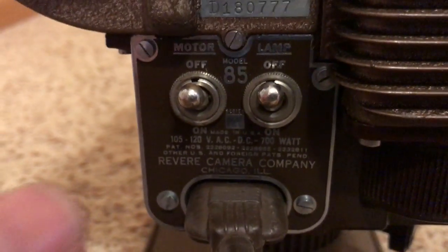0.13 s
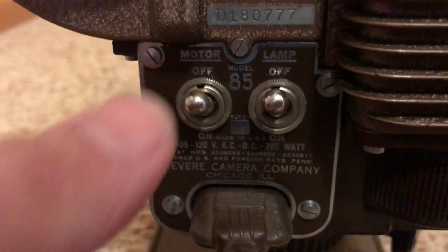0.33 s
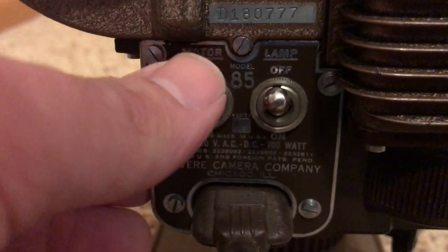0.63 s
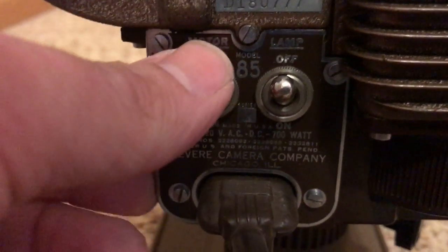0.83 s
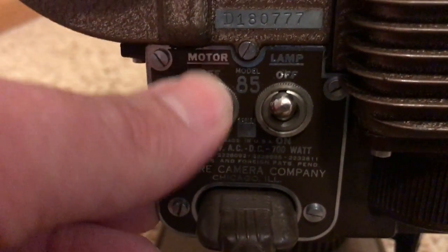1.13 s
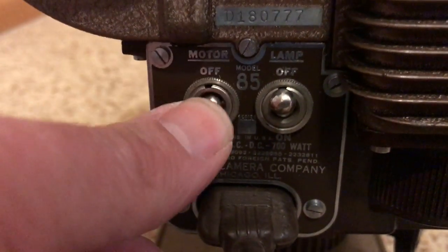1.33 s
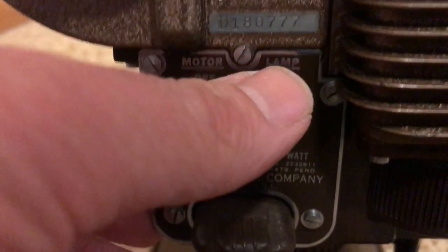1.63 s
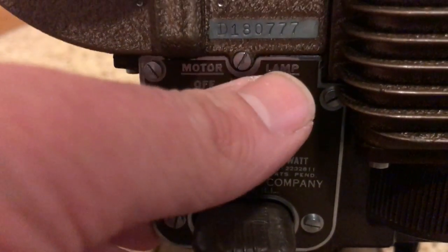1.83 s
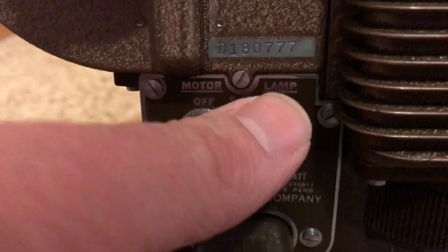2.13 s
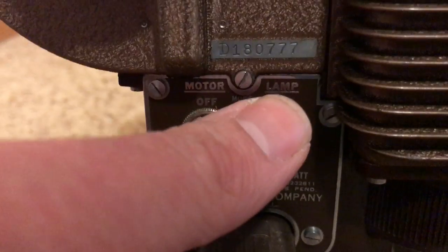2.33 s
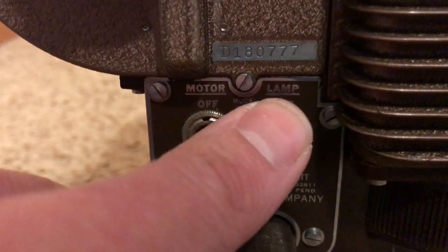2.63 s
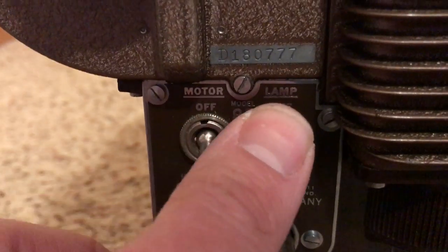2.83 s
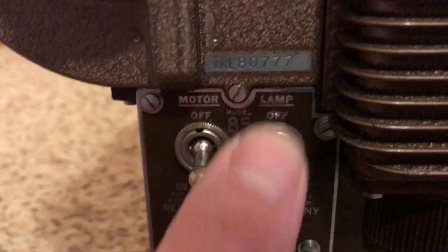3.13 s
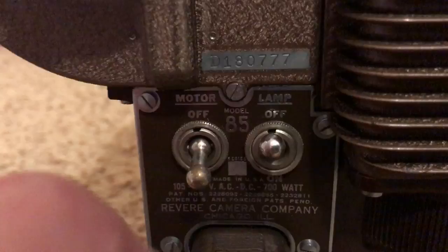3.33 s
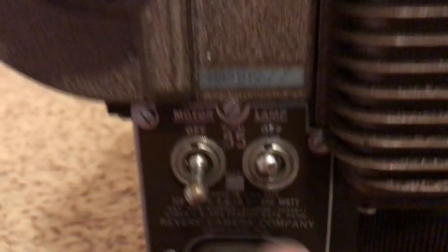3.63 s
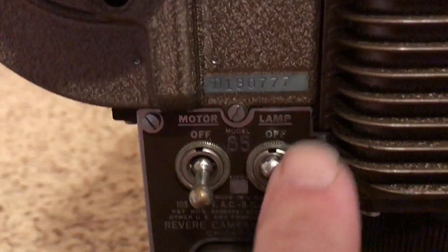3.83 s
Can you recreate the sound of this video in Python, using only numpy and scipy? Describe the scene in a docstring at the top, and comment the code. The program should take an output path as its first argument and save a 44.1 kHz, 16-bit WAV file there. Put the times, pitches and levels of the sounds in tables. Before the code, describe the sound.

An old film projector starts with one sharp toggle switch click, then its motor whines up into a steady whir of rushing fan and chattering gears, with a few light clacks. Close microphone in a quiet room.

```python
"""A faint rustle, a sharp click, then an old film projector whirs up to speed, close by in a quiet room.
The click is a thumb flipping a toggle switch, whose contacts bounce and ring a small plate.
As the motor spins up, the fan rushes and the gears whine, growl and chatter in the metal housing.
A dry bearing chirps, the belt slips twice, and now and then the running mechanism clacks."""
import sys
import numpy as np
from scipy import signal
from scipy.fft import rfft, irfft
from scipy.io import wavfile

SR = 44100
rng = np.random.default_rng(int(sys.argv[2]) if len(sys.argv) > 2 else 0)


def bounce(signal):
    """Save signal as a 16-bit WAV file at the path given by the first command-line argument."""
    frames = np.transpose(np.atleast_2d(signal))
    limited = np.clip(frames, -1, 1)
    pcm = np.round(limited * 32767).astype(np.int16)
    wavfile.write(sys.argv[1], SR, pcm)


N = 176400
T = np.arange(N) / SR
HZ = np.maximum(np.fft.rfftfreq(N, 1 / SR), 1)   # the frequency of each point in a spectrum

POWER_ON_S, FIRST_TICK_S = 1.273, 1.331
TOP_SPEED_HZ, TURNS_PER_FRAME = 101.55, 3   # shaft turns per second; turns per picture on the film

# tone colour of a sharp crack: f/Hz, level/dB
CRACK_SPECTRUM = [(300, -45), (1000, -2), (3000, -7), (6000, 2.5), (11000, 0.5), (16000, -12)]
# tone colour of rushing air: f/Hz, level/dB
AIR_SPECTRUM = [(27, -28), (48, -9.5), (160, -1.5), (280, -3.5), (550, 3), (1000, 3), (2000, -1.5),
                (2900, -5.5), (5500, -5.5), (8500, -7.5), (16000, -17.5)]
# tone colour of rattling machine parts: f/Hz, level/dB
CHATTER_SPECTRUM = [(100, -27), (330, -12), (680, -7.5), (900, -2.5), (1100, -1.5), (1350, -2), (2000, -13),
                    (4000, -19.5), (14000, -27)]


def from_db(db):
    """Turn decibels into a factor to multiply by."""
    return 10 ** (np.asarray(db) / 20)


def unit_power(x):
    """Scale a signal so that its average power is 1."""
    return x / np.sqrt(np.mean(x ** 2) + 1e-20)


def bell(hz, centre_hz, width_hz):
    """The hill-shaped curve of a resonance, 1 at its centre."""
    return 1 / (1 + (2 * (hz - centre_hz) / width_hz) ** 2)


def filtered(x, gain):
    """Multiply each frequency in x by its own gain."""
    return irfft(rfft(x) * gain, N)


def colour(x, spectrum, extra_db=0):
    """Give x the tone colour listed in a table, at power 1."""
    hz, db = np.transpose(spectrum)
    curve_db = np.interp(np.log(HZ), np.log(hz), db) + extra_db
    return unit_power(filtered(x, from_db(curve_db)))


def noise(spectrum, extra_db=0):
    """Noise with the tone colour listed in a table, at power 1."""
    return colour(rng.standard_normal(N), spectrum, extra_db)


def shaped_noise(gain):
    """Noise with a given gain at each frequency, at power 1."""
    return unit_power(filtered(rng.standard_normal(N), gain))


def drift(rate_hz):
    """A smooth random wander, typically about 1 in size."""
    return shaped_noise(1 / (1 + (HZ / rate_hz) ** 2))


def decay(t60):
    """A fade from 1 that drops by 60 dB in t60 seconds, the ring time."""
    return from_db(-60 * np.minimum(T / t60, 5))


def swell(start, length):
    """One rounded rise and fall."""
    return np.sqrt(np.abs(np.sin(np.pi * np.clip((T - start) / length, 0, 1))))


def convolve(x, response):
    """Let every sample of x set off its own copy of a response."""
    return signal.fftconvolve(x, response)[:N]


def room_hum():
    """The quiet room has a faint low hum and hiss."""
    # tone colour of the background: f/Hz, level/dB
    background = [(20, -24), (50, -10), (62, 5), (80, -14), (130, -11.5), (190, -20), (400, -25),
                  (1000, -32.5), (4000, -38.5), (16000, -44.5)]
    return from_db(-64.5) * noise(background)


def hand_rustles():
    """The hand brushes past as the thumb finds the lever."""
    # brushing movements: start/s, length/s, level/dB, extra treble at 10 kHz/dB
    strokes = [(-.05, 0.61, -74.5, -2), (0.597, .09, -76, -4), (.865, 0.067, -72, 5)]
    # tone colour of the brushing: f/Hz, level/dB
    rustle_spectrum = [(300, -13), (1800, 0), (2700, -6), (3900, 1), (7200, -2.5), (10500, -6),
                       (16000, -10)]
    return sum(from_db(db) * swell(start, length) * noise(rustle_spectrum, treble_db * HZ / 10000)
               for start, length, db, treble_db in strokes)


def switch():
    """Each contact cracks, rings the switch plate and nudges the heavy body into a low thud."""
    # the lever creeps, snaps over and bounces: t/s, level/dB
    contacts = [(1.2514, -40), (1.263, -39), (1.27, -35), (1.2741, 2.5), (1.2748, -1), (1.276, -2.5)]
    # ringing tones of the switch and its plate: f/Hz, level/dB, ring time/s
    plate_modes = [(597, -29, 0.014), (800, -19.5, .02), (1090, -19, 0.019), (1560, -26.5, 0.012),
                   (2210, -17.5, 0.0097), (3394, -23, .012), (4170, -23, 0.015), (4940, -18, 0.019),
                   (5840, -10.5, 0.004), (6450, -19, 0.007), (7130, -21, 0.0058), (8700, -22, 0.0098)]
    lag_cycles, crack_db = 1.416, -11
    clicks, cracks, plate = np.zeros(N), np.zeros(N), 0
    for k, (hz, db, t60) in enumerate(plate_modes):
        age = np.maximum(T[:SR // 8] - lag_cycles / hz, 0)   # lower tones arrive later
        plate += (-1) ** k * from_db(db - 60 * age / t60) * np.sin(2 * np.pi * hz * age)
    for s, db in contacts:
        start = int(s * SR)
        clicks[start] += from_db(db)
        crack = from_db(db + crack_db) * noise(CRACK_SPECTRUM) * decay(t60=.011)
        cracks[start:] += crack[:N - start]
    bass_cut = signal.butter(4, 450, "high", fs=SR, output="sos")   # a small plate gives off no bass
    snap = signal.sosfilt(bass_cut, convolve(clicks, plate) + cracks)
    body = np.sin(2 * np.pi * 101 * T) * decay(t60=.065)
    thud = from_db(-48) * convolve(clicks, body)
    return snap + thud + from_db(-20.5) * room_echo(snap)


def room_echo(x):
    """Reflections die away quickly in the carpeted room."""
    # tone colour of the reflections: f/Hz, level/dB
    echo_spectrum = [(100, -11), (500, 2), (1200, -5), (2500, -1.5), (6000, -8), (16000, -10.5)]
    tail = noise(echo_spectrum) * decay(t60=.26)
    return convolve(x, tail / np.linalg.norm(tail))


def shaft(spin_up_s=.35, wobble=.002):
    """The motor eases up to speed. Returns the speed (0 to 1) and the turns made so far."""
    speed = 1 - np.exp(-np.maximum(T - POWER_ON_S, 0) / spin_up_s)
    turns_per_s = TOP_SPEED_HZ * speed * (1 + wobble * drift(5))
    return speed, np.cumsum(turns_per_s) / SR


def housing():
    """The metal housing boosts some frequencies and weakens others. Returns dB at each frequency."""
    # its peaks and dips: f/Hz, width/Hz, gain/dB
    resonances = [(1027, 270, 6), (1630, 144, -5.5), (1840, 360, 3), (2260, 410, -2), (3443, 54, 7),
                  (3677, 194, 6.5), (4440, 170, -5), (4850, 180, 3), (5870, 710, 7.5), (6980, 140, 3),
                  (9630, 950, 2.5), (10420, 590, -5.5)]
    return sum(db * bell(HZ, hz, width) for hz, width, db in resonances)


def fan(speed, housing_db):
    """Air rushes through the housing, growing steeply louder with speed."""
    return from_db(-26) * speed ** 2.2 * noise(AIR_SPECTRUM, housing_db)


def gear_chatter(speed, housing_db, top_hits_per_s=1500, spread_db=2.5):
    """Gear teeth touch in a dense, uneven patter that thickens with speed."""
    sizes = from_db(spread_db * np.minimum(rng.exponential(1, N), 4))
    signs = rng.choice([-1, 1], N)
    hits = rng.random(N) < top_hits_per_s * speed / SR
    return from_db(-26) * colour(sizes * signs * hits, CHATTER_SPECTRUM, housing_db)


def film_claw(turns, housing_db):
    """The claw that pulls the film along knocks once for every picture."""
    new_frame = np.diff(turns // TURNS_PER_FRAME, prepend=0)
    sizes = from_db(np.clip(rng.standard_normal(N), -2, 2))
    knocks = convolve(new_frame * sizes, decay(t60=.021)) * rng.standard_normal(N)
    return from_db(-38) * colour(knocks, CHATTER_SPECTRUM, housing_db)


def whine(speed, turns, flutter_hz=33):
    """Tones from the unbalanced shaft and the gears swell as they climb through resonances."""
    # shaft, gear and motor tones:
    # cycles per turn, steady level/dB, resonance level/dB, resonance f/Hz, width/Hz
    tones = [(1, -52.5, -51.5, 90.4, 16), (8, -56, -32.5, 558, 120), (8, -54, -40.5, 743, 87),
             (12, -52, -33, 950, 240), (17, -44.5, -35.5, 1386, 240), (21, -53, -39.5, 1840, 270),
             (23, -49, -51.5, 2162, 380), (24, -67, -37, 2050, 580), (25, -76, -34.5, 2080, 290),
             (26, -65, -36.5, 1910, 890), (34, -54, -39, 1930, 410), (36, -62, -44.5, 2720, 1000),
             (46, -62, -42, 2150, 640)]
    out = 0
    for per_turn, steady_db, peak_db, hz, width in tones:
        roughness = .45 if per_turn in (1, 8, 23, 24) else .85   # a few are cleaner, the rest rasp
        resonance = bell(per_turn * TOP_SPEED_HZ * speed, hz, width) ** 1.61
        level = from_db(steady_db) * speed ** 3 + from_db(peak_db) * speed * resonance
        # a complex factor shakes both the loudness and the phase
        flutter = 1 + roughness * (drift(flutter_hz) + 1j * drift(flutter_hz))
        flutter /= np.sqrt(1 + 2 * roughness ** 2)
        out += level * np.real(flutter * np.exp(2j * np.pi * per_turn * turns))
    return 2 * out


def motor_sparks(speed, housing_db, mains_hz=60):
    """The motor's brushes spark on each half wave of the mains while it draws its starting current."""
    level = from_db(-26.5) * (1 - speed) ** .5 * speed ** 3
    pulses = 2 * np.sin(2 * np.pi * mains_hz * T) ** 2
    return level * pulses * noise(AIR_SPECTRUM, housing_db)


def slack_ticks():
    """Two light ticks sound as the loose parts take up their slack."""
    fades = sum(from_db(db) * np.roll(decay(t60=.02), int(s * SR))
                for s, db in [(FIRST_TICK_S, -46), (1.401, -46.5)])
    return fades * noise(CRACK_SPECTRUM)


def gear_growl(speed, turns, teeth=8):
    """From the first tick on, the loaded teeth strike hard, easing off as the shaft nears full speed."""
    # tone colour of the straining gears: f/Hz, level/dB
    growl_spectrum = [(200, -22.5), (340, -13), (480, -15.5), (800, -11.5), (1060, -0.5), (1280, -21),
                      (4000, -44)]
    strain = speed ** 2.6 * (1 - speed) ** 1.8 * (T > FIRST_TICK_S)
    pulses = 1 + .42 * np.cos(2 * np.pi * teeth * turns)
    return from_db(-36) * strain / strain.max() * pulses * noise(growl_spectrum)


def bearing(turns, chirp_turns=.31, spread_db=5):
    """A dry spot rubs out a rising chirp once a turn; for a while every third chirp stands out."""
    # how the chirps change: t/s, level/dB, drop on two turns out of three/dB, place in the turn/turns
    course = [(1.415, -46, 0, 0), (1.425, -30, -2, -.19), (1.48, -20.5, 2.5, 0.06), (1.56, -30, -9, 0.2),
              (1.64, -29, 0, 0.3), (1.80, -32, -4, 0.28), (1.90, -27.5, 13, 0.2), (2.1, -34, 6, 0.03),
              (2.5, -48, 24, 0.1), (4.0, -37, 3, 0)]
    # resonances that a chirp climbs through: f/Hz, width/Hz, level/dB, delay/turns
    chirp_modes = [(12360, 1300, -9.5, -0.0085), (13200, 540, -5, 0.0015), (13750, 520, -10, .06),
                   (15000, 1100, -7, .1)]
    times, db, drop_db, place = np.transpose(course)
    chirps = 0
    for hz, width, mode_db, delay in chirp_modes:
        turn, part_of_turn = np.divmod(turns - np.interp(T, times, place) - delay, 1)
        rub = np.sin(np.pi * np.minimum(part_of_turn / chirp_turns, 1)) * (T > times[0])
        weak_turn = turn % TURNS_PER_FRAME > 0
        level_db = mode_db + np.interp(T, times, db) - np.interp(T, times, drop_db) * weak_turn
        level_db += spread_db * rng.standard_normal(512)[turn.astype(int)].clip(-1, 1)
        chirps += from_db(level_db) * rub * shaped_noise(bell(HZ, hz, width))
    return chirps + from_db(-8.5) * room_echo(chirps)


def belt(wobble=.02):
    """The belt groans, then squeaks briefly, as it takes up the load."""
    # slips of the belt: start/s, length/s, level/dB, f/Hz
    slips = [(1.467, 0.096, -42, 310), (1.547, 0.04, -31.5, 635)]
    out = 0
    for start, length, db, hz in slips:
        cycles = np.cumsum(hz * (1 + wobble * drift(40))) / SR
        out += from_db(db) * swell(start, length) ** 2 * np.sin(2 * np.pi * cycles)
    return out


def clacks():
    """Now and then the mechanism catches and knocks the housing."""
    # the knocks: t/s, level/dB
    knocks = [(2.027, -17), (2.117, -18.5), (2.392, -14), (2.605, -14.5), (2.718, -15.5), (2.883, -16.5),
              (3.84, -19)]
    # ringing tones of the knocked housing: f/Hz, level/dB, ring time/s
    clack_modes = [(904, -17, 0.047), (1086, -0.5, 0.047), (3580, -7, .015)]
    clicks = np.zeros(N)
    for s, db in knocks:
        clicks[int(s * SR)] += from_db(db)
    ring = sum(from_db(db) * np.sin(2 * np.pi * hz * T) * decay(t60) for hz, db, t60 in clack_modes)
    return convolve(clicks, ring)


def handling_bumps(width_hz=65):
    """Handling the camera that holds the microphone makes soft, low bumps."""
    # the bumps: start/s, length/s, level/dB, centre f/Hz
    bumps = [(2.602, 0.14, -40, 114), (2.85, 0.069, -43, 89.5), (3.148, 0.052, -42.5, 75),
             (3.354, 0.088, -43, 160)]
    return sum(from_db(db) * swell(start, length) * shaped_noise(bell(HZ, hz, width_hz) ** 2)
               for start, length, db, hz in bumps)


def past_thumb(x):
    """The thumb blocks parts of the treble; the sound swishes open as it lifts away."""
    # treble bands that the thumb weakens: f/Hz, width/Hz, gain/dB
    dips = [(7850, 810, -5), (11900, 1100, -1.5)]
    # how much it covers: t/s, strength of the dips (below 0 the thumb reflects instead)
    cover = [(2.6, 0.68), (2.85, 1.4), (3.18, 1.6), (3.27, -0.27), (3.62, 0.1), (3.75, 0.18)]
    shaded = filtered(x, from_db(sum(db * bell(HZ, hz, width) for hz, width, db in dips)))
    return x + np.interp(T, *np.transpose(cover)) * (shaded - x)


def scene():
    """Add room, rustles, switch, projector and handling bumps into one channel."""
    speed, turns = shaft()
    housing_db = housing()
    air = fan(speed, housing_db)
    rattle = gear_chatter(speed, housing_db) + film_claw(turns, housing_db)
    rattle *= np.sqrt(speed.mean()) * speed ** 1.3   # louder with speed
    whir = past_thumb(air + rattle + motor_sparks(speed, housing_db))
    projector = whir + whine(speed, turns) + gear_growl(speed, turns)
    projector += belt() + slack_ticks() + clacks() + bearing(turns)
    return (switch() + projector + hand_rustles() + handling_bumps() + room_hum())[None]


def record(dry):
    """The microphone drops the deepest bass, rounds off the loudest peaks and cuts the highest treble."""
    bass_cut = signal.butter(3, 38, "high", fs=SR, output="sos")
    treble_cut = signal.ellip(10, .1, 70, 15900, fs=SR, output="sos")
    rounded = .9 * np.tanh(signal.sosfilt(bass_cut, dry) / .9)
    return signal.sosfilt(treble_cut, rounded)


dry = scene()
out = record(dry)
bounce(out)
```